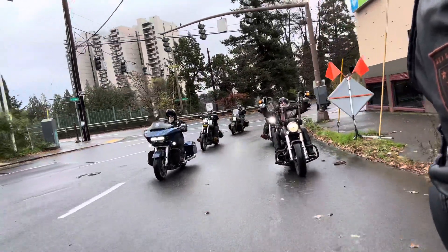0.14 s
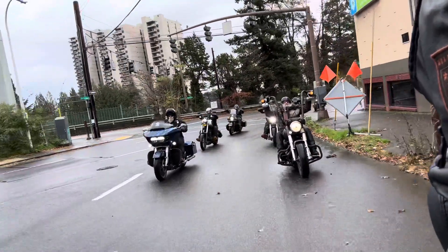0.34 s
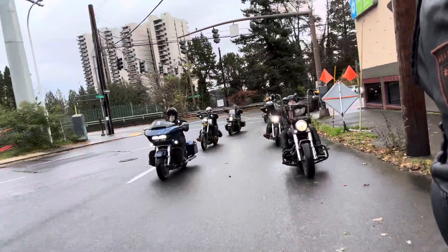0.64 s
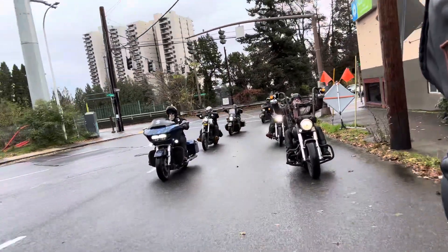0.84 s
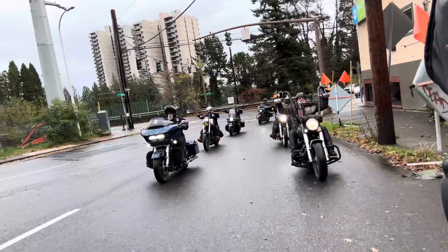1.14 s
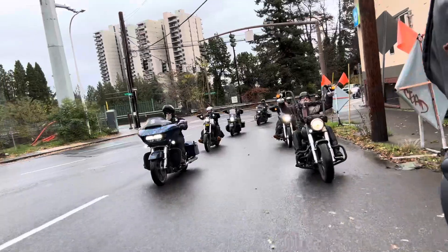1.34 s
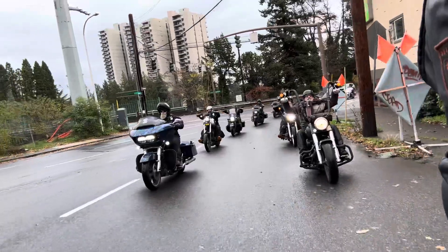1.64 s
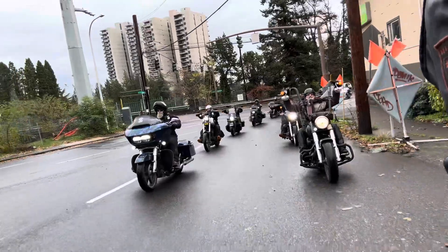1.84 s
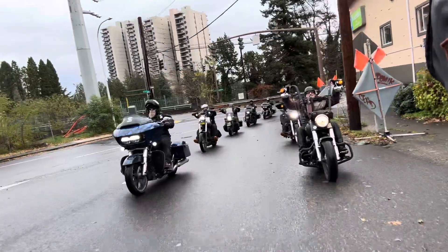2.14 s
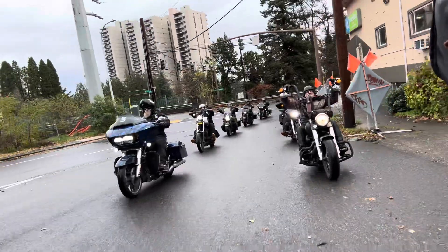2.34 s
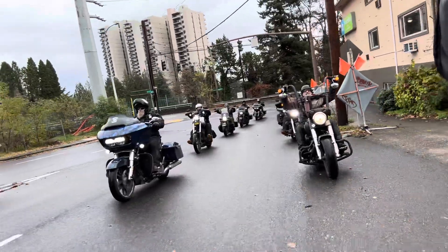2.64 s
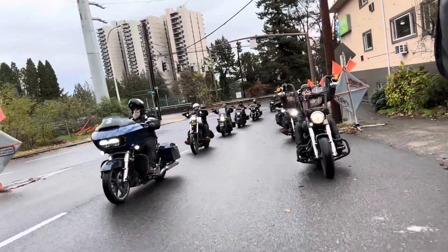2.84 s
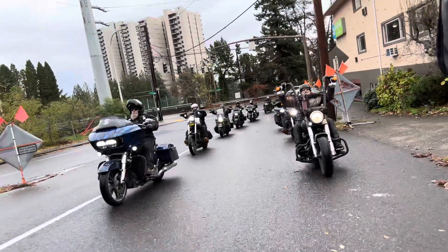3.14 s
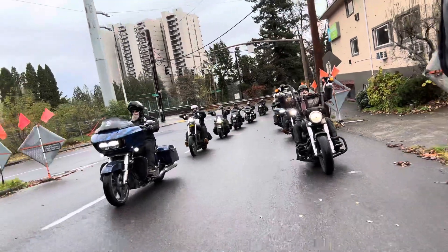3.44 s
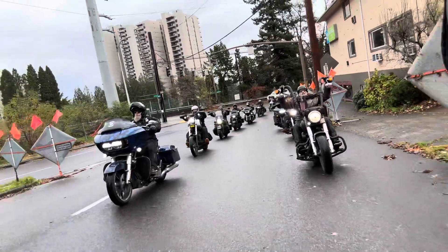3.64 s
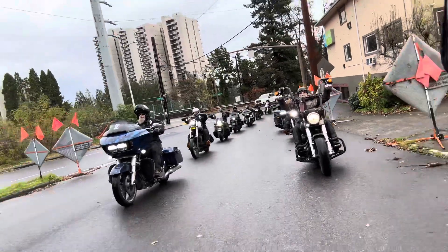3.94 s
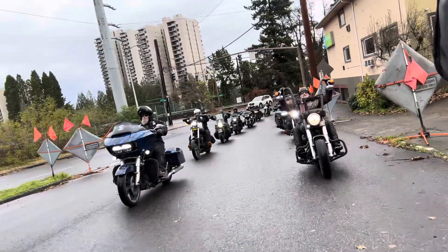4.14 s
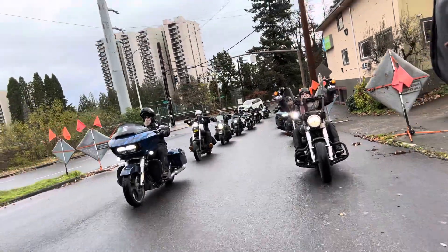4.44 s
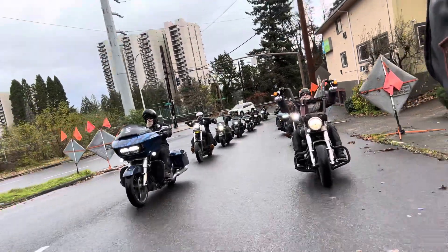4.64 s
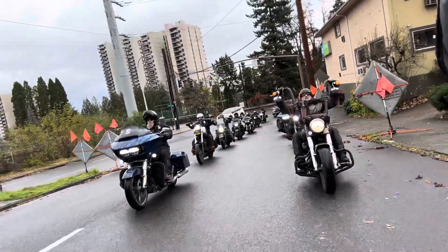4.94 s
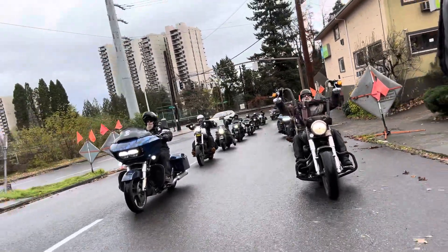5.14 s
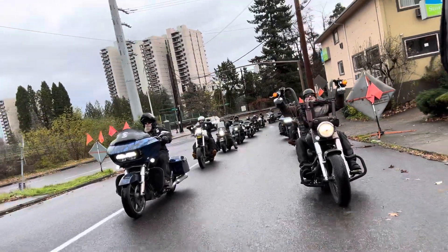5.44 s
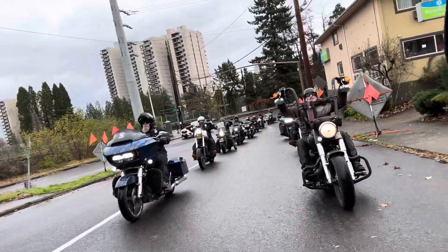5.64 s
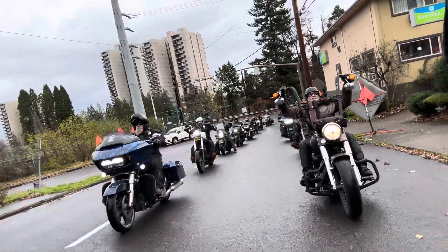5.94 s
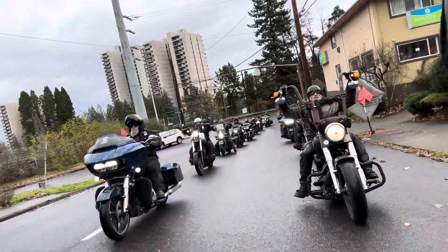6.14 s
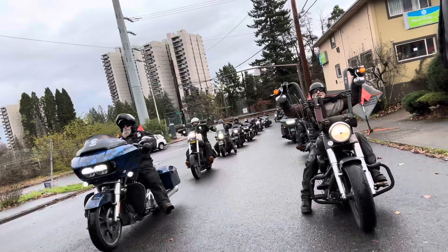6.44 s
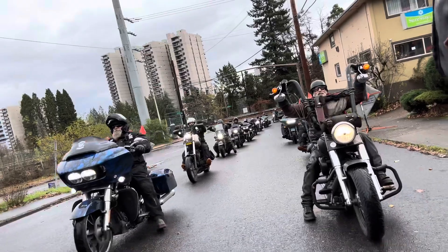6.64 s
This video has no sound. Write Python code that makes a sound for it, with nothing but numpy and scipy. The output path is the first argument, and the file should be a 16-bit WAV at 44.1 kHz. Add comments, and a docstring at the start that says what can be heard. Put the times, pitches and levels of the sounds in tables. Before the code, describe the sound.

Outdoors, close in front of a motorcycle procession, a stereo microphone hears a continuous lumpy bass rumble and soft wet-road hiss. Individual exhausts stand out: scattered dull pops, a deep burst, raspy cracks, then a dense loud crackle that fades into quick light ticking. A low hum joins later, and strong barking bursts with muffled thumps finish, briefly slapping off nearby walls.

```python
"""A column of big twin-cylinder motorcycles rolls slowly along a wet street.
From the start, many uneven firings blend into a rumble over a low wavering tone; tyres and engines hiss.
Dull pops give way to deep cracks at 0.7 s and raspy ones from 1.5 s; a higher tone joins from 2.2 to 3.4 s.
A crackling run from 3 s thins into a coasting patter until 4.3 s, and another tone enters at 4.9 s.
Barking and full cracks, then muffled ones, close the scene; the cracks echo between the buildings."""
import sys
import numpy as np
from scipy import signal
from scipy.fft import rfft, irfft, next_fast_len
from scipy.io import wavfile
from scipy.ndimage import map_coordinates

SR = 44100
rng = np.random.default_rng(int(sys.argv[2]) if len(sys.argv) > 2 else 0)


def store_pcm(level_fs):
    """Save levels as 16-bit WAV."""
    pcm = np.round(np.clip(level_fs, -1, 1) * 32767).astype(np.int16)
    wavfile.write(sys.argv[1], SR, np.atleast_2d(pcm).T)


N = 298998
HALVES = np.array([[.5], [-.5]])  # splits a left-over-right difference between the two ports


def amp(db):
    """Decibels to gain."""
    return 10 ** (np.asarray(db) / 20)


def evened(x):
    """Scales to rms 1."""
    return x / np.sqrt(np.mean(x ** 2) + 1e-20)


def read(points, hz):
    """Looks a table up on a log-frequency axis."""
    f, value = np.transpose(points)
    return np.interp(np.log(hz + 1), np.log(f + 1), value)


def curve(rows, index):
    """One column of a table, at every sample."""
    rows = np.array(rows)
    return np.interp(np.arange(N) / SR, rows[:, 0], rows[:, index])


def colour(x, gain):
    """Multiplies the spectrum by gain(Hz)."""
    size = next_fast_len(N + 4096)
    return irfft(rfft(x, size) * gain(np.fft.rfftfreq(size, 1 / SR)), size)[..., :N]


def band(hz, lo_hz, hi_hz):
    """Soft-edged pass band."""
    return 1 / np.sqrt((1 + (lo_hz / (hz + 1)) ** 8) * (1 + (hz / hi_hz) ** 8))


def wander(hz):
    """Slow random drift of rms 1, with components up to hz."""
    f = np.geomspace(hz / 20, hz, 16)[:, None]
    t = np.arange(0, N + 200, 200) / SR
    slow = (np.sin(2 * np.pi * (f * t + rng.random(f.shape))) / np.sqrt(f)).sum(0)
    return np.interp(np.arange(N) / SR, t, evened(slow))


def struck(trains, shape):
    """Starts a copy of shape at every impulse."""
    return signal.oaconvolve(trains, shape[None], axes=1)[:, :N]


# the cracks that stand out, by pipe: (time [s], strength of the jet [dB], strength of the body [dB])
CRACKS = {"thin": [(0.6853, -40, -28), (0.7023, -40, -19), (4.6907, -35.5, -32), (5.2214, -38, -28),
          (5.2315, -37.5, -29), (5.252, -40, -34), (5.2779, -39, -32.5)], "deep": [(0.7238, -27, -15),
          (0.7482, -23, -14), (0.7806, -26, -13.5), (0.8016, -21, -11.5), (0.8294, -37.5, -16.5),
          (0.848, -52, -23)], "muffled": [(0.667, -46, -19.5), (0.8994, -39, -10.5), (1.855, -42, -25),
          (1.946, -34, -20), (2.26, -46, -17), (2.65, -46, -26), (2.813, -41, -22), (3.993, -53, -22.5),
          (4.925, -41, -20.5), (5.402, -49.5, -27.5), (5.782, -39, -16.5), (6.4472, -43.5, -16),
          (6.4802, -46, -12.5), (6.5041, -35.5, -18.5), (6.638, -40, -14.5), (6.667, -39, -17),
          (6.689, -47, -13.5), (6.7326, -38.5, -20.5), (6.753, -36, -18.5)], "raspy": [(1.4526, -39.5, -31),
          (1.5065, -31, -25), (1.6506, -26.5, -22.5), (1.6714, -23, -21), (1.6921, -23, -19.5),
          (1.7114, -32.5, -27), (1.7374, -29.5, -27), (2.2104, -30.5, -28.5), (2.2573, -25, -42)],
          "crackling": [(2.9801, -29, -17.5), (3.0101, -26, -13), (3.046, -18.5, -12.5),
          (3.0699, -24.5, -12), (3.1672, -29.5, -19.5), (3.1926, -30.5, -20), (3.4271, -37, -27),
          (3.456, -21.5, -22), (3.4755, -32, -13), (3.5009, -22.5, -21), (3.5194, -25, -14.5),
          (3.5423, -24, -17.5), (3.5584, -29.5, -15.5), (3.5808, -23, -15), (3.5964, -29, -24),
          (3.6157, -29.5, -14.5), (3.6296, -16.5, -12), (3.6506, -16, -12), (3.6644, -45, -15),
          (3.685, -23, -16.5), (3.6994, -40, -25), (3.7199, -31.5, -21.5)],
          "coasting": [(3.8008, -31.5, -31), (3.8174, -46, -34.5), (3.8412, -29.5, -45),
          (3.8586, -29.5, -22.5), (3.8831, -34.5, -37.5), (3.9014, -34, -40), (3.927, -30, -28),
          (3.9464, -37, -34.5), (3.9729, -27.5, -31), (3.9928, -39, -30), (4.0208, -33, -33.5),
          (4.0402, -42, -34), (4.0716, -32, -35), (4.0926, -39, -26), (4.1235, -34, -42),
          (4.1455, -38, -27), (4.1774, -37, -28.5), (4.2009, -38.5, -33), (4.2363, -41.5, -30.5),
          (4.2612, -37, -33.5), (4.2986, -46, -38)], "barking": [(5.6351, -30.5, -29.5),
          (5.7034, -17.5, -9), (5.7269, -24, -13), (5.7494, -25.5, -20)], "full": [(1.7814, -32.5, -26.5),
          (1.8961, -32.5, -29.5), (1.9365, -51, -27.5), (5.8511, -48, -31.5), (5.8716, -30.5, -28.5),
          (5.9125, -23.5, -13), (5.9324, -23, -16.5), (5.9559, -22, -16), (5.9714, -26, -12.5),
          (5.9934, -25.5, -15.5), (6.1235, -27, -17.5), (6.1469, -19.5, -18), (6.1754, -21, -16.5),
          (6.1958, -21, -11.5), (6.2198, -25.5, -16.5), (6.5515, -24, -14.5), (6.5774, -27, -20.5),
          (6.5974, -22.5, -15.5), (6.6194, -25, -14.5)], "dull": [(0.146, -33, -32), (0.33, -35, -32.5),
          (0.367, -33, -31), (0.436, -28, -34), (1.032, -33, -35), (1.363, -39, -36), (1.547, -32, -34),
          (2.873, -27, -30.5), (3.145, -40, -33.5), (3.324, -26, -36.5), (3.381, -28, -26),
          (4.338, -38, -40.5), (4.648, -36, -26), (4.832, -41, -36.5), (5.071, -42, -41), (5.551, -29, -33),
          (6.266, -35, -24), (0.473, -36, -53), (0.621, -32, -37), (1.226, -37, -37), (1.604, -33, -42),
          (1.816, -34, -30.5), (1.918, -27, -27.5), (1.968, -33, -26), (1.98, -31, -29.5),
          (1.997, -34, -32), (2.021, -28, -33), (2.294, -25, -30.5), (3.759, -29, -28), (3.795, -31, -36),
          (4.056, -22.5, -26), (4.565, -33, -36.5), (5.307, -35.5, -35.5), (5.332, -30, -35),
          (5.599, -38, -29), (5.813, -41, -35)]}
# each pipe's balance, added to those strengths:
# (thud [dB], thump [dB], knock [dB], bark [dB], snap [dB], crackle [dB], sizzle [dB])
PIPES = {"deep": (4, -11, -18, -13, -20, -18, -15), "raspy": (2.5, -16.5, -5, -6.5, -13, -13, -13.5),
         "crackling": (4, -1.5, -1, -13.5, -19, -5.5, -11.5),
         "coasting": (-5, -7, -1.5, -20, -17, -4.5, -13),
         "barking": (-0.5, -15.5, -22, -6.5, -16, -14, -35),
         "muffled": (-0.5, -18.5, -25, -4.5, -18.5, -11.5, -12),
         "full": (7, 2, -0.5, -5.5, -11.5, -14.5, -26), "thin": (-15, -15.5, -21, -6, -2, -21, -29.5),
         "dull": (-12, -2, 2.5, -16.5, -24.5, -23, -25.5)}


def singles():
    """Rows of time and seven levels: three parts follow the body, four the jet."""
    rows = []
    for pipe, hits in CRACKS.items():
        for s, jet_db, body_db in hits:
            parts_db = np.repeat([body_db, jet_db], [3, 4]) + PIPES[pipe]
            rows.append([s, *parts_db])
    return np.array(rows)


def strays():
    """Faint dull pops from down the column, at random moments."""
    pops_per_s, loudest_db, range_db = 2.5, -27.5, 8.0  # before the balance of the dull pipe
    draw = rng.random((60, 2))
    s = np.cumsum(-np.log(1 - draw[:, 0]) / pops_per_s)
    rows = np.column_stack([s, loudest_db - range_db * draw[:, 1:] + PIPES["dull"]])
    return rows[s < N / SR - .01]


def blow(start_hz, end_hz, fall_s, decay_s, rise_s):
    """One exhaust pulse: the steep front comes first, so the pitch drops as it dies."""
    lag_s = 0.001  # the jet leaves the pipe before the body of the pulse
    t = np.maximum(np.arange(3000) / SR - lag_s, 0)
    turns = end_hz * t + (start_hz - end_hz) * fall_s * (1 - np.exp(-t / fall_s))
    pulse = np.sin(2 * np.pi * turns) * np.exp(-t / decay_s) * (1 - np.exp(-t / rise_s))
    return pulse / abs(pulse).max()


# fall in pitch of thud and thump: (start [Hz], end [Hz], time constant of the fall [s])
SWEEP = (520., 102.8, 0.00362)
# silencer resonances on the body of the pulse: (frequency [Hz], gain [dB])
BODY = [(100, 1), (200, 2), (300, -2.5), (410, 1.5), (500, 3.5), (620, 0), (750, 1), (870, 5), (1000, -4)]


def bodies(thuds, thumps, knocks):
    """The gas pulse as falling tones, coloured by the silencer: thud with thump, and knock."""
    thud = struck(thuds, blow(*SWEEP, decay_s=0.0052, rise_s=0.027))
    thump = struck(thumps, blow(*SWEEP, decay_s=0.0019, rise_s=0.00084))
    knock = struck(knocks, blow(973.0, 476.0, fall_s=0.0027, decay_s=0.0043, rise_s=0.00023))
    # the silencer cuts the body off steeply
    thump = colour(thump, lambda hz: band(hz, 0, 1000)) + colour(thud, lambda hz: band(hz, 0, 580))
    thump = colour(thump, lambda hz: amp(read(BODY, hz)))
    knock = colour(knock, lambda hz: band(hz, 590, 820) * amp(read(BODY, hz)) * np.exp(1j * -0.2))
    return thump, knock


def jet(train, table, rise_s, decay_s, alike):
    """A short puff of coloured noise at every crack."""
    t = np.arange(1000) / SR
    shape = (1 - np.exp(-t / rise_s)) * np.exp(-t / decay_s)
    puffs = struck(train, shape / shape.max())
    noise = rng.choice([-1., 1.], (2, N))
    noise = noise + alike * noise[::-1].sum(0) / 2  # turbulence partly alike at the two ports
    gain = lambda hz: amp(read(table, hz))
    return colour(puffs * noise, gain) / np.std(colour(noise, gain))


# spectra of the escaping gas, lowest first: (frequency [Hz], relative level [dB per Hz])
BARK = [(700, -34.5), (950, 6.5), (1150, 7), (1500, 9.5), (2000, 6.5), (2500, -13.5), (3200, -5),
        (3700, -10), (5000, -68)]
SNAP = [(1500, -36.5), (1900, -3), (2300, 5), (2700, 2.5), (3100, -7.5), (3500, -10.5), (4200, -45.5)]
CRACKLE = [(1900, -37), (2700, -10.5), (3600, -6), (4100, -0.5), (4500, -2.5), (5300, -4.5), (6200, -12.5),
           (7500, -49.5)]
SIZZLE = [(5500, -39.5), (6600, -4.5), (7400, -4.5), (8400, 7), (9400, 1), (10200, -26), (11200, -15.5),
          (13000, -12), (14600, -21.5), (15700, -9)]
# resonances of a long tail pipe: (frequency [Hz], relative level [dB per Hz])
RING = [(600, -36), (800, -0.5), (950, 12), (1150, -7.5), (1550, -3), (1850, -14), (2300, 3), (2750, -16),
        (3050, -3.5), (3400, -23), (4000, -46)]
# pipes long enough to ring: name to level over the jet strength [dB]
RINGS_DB = {"deep": -2.5, "full": -14.5, "raspy": -19, "muffled": -9.5}


def jets(barks, snaps, crackles, sizzles):
    """Gas leaving the pipe as four bands of turbulent noise, plus the ring of the long pipes."""
    ring = np.zeros((1, N))
    for pipe, db in RINGS_DB.items():
        s, jet_db = np.transpose(CRACKS[pipe])[:2]
        ring[0, np.round(s * SR).astype(int)] = amp(jet_db + db)
    return (jet(barks, BARK, rise_s=0.00037, decay_s=0.0063, alike=1.1)
            + jet(snaps, SNAP, rise_s=0.00092, decay_s=0.0028, alike=0.95)
            + jet(crackles, CRACKLE, rise_s=0.0013, decay_s=0.0015, alike=0.87)
            + jet(sizzles, SIZZLE, rise_s=0.0032, decay_s=0.0019, alike=3.4)
            + jet(ring, RING, rise_s=0.0015, decay_s=0.004, alike=0.94))


# where the revving bike is heard; the level difference acts on the jets:
# (time [s], left over right [dB], lead of the left port [ms], level sent to the echoes [dB])
REVVER = [(0, 5, 0.37, -14), (1.0, 1.5, 0.61, -2), (1.4, 3, -0.25, -3.5), (2.4, 3.5, 0.091, -7.5),
          (2.8, -6, 0.22, -11), (4.5, 1, 0.263, -5), (5.5, -3.5, 0.48, -8), (6.78, -7.5, 0.41, -4)]
# phase of the port pair beyond its plain delay: (frequency [Hz], lead of the left [rad])
TURN = [(100, 0.1), (250, -0.2), (450, 0.7), (600, 1.35), (1100, 0.2), (2240, -0.14), (3000, 1.8),
        (4000, -0.3), (5700, 1.1), (6600, -2), (6900, -4.5), (8500, -9.5), (9200, -11.5)]


def cracks():
    """Each crack: a knock, a thump and a thud of falling pitch, and short jets of noise."""
    rows = singles()
    scatter_db = 1.34  # each part of each crack varies
    rows[:, 1:] += scatter_db * rng.standard_normal((len(rows), 7))
    rows = np.vstack([rows, strays()])
    trains = np.zeros((7, 1, N))
    trains[:, 0, np.round(rows[:, 0] * SR).astype(int)] = amp(rows[:, 1:].T)
    thump, knock = bodies(*trains[:3])
    gas = jets(*trains[3:])
    # one port hears a bike to the side first
    heard_at = np.arange(N) + HALVES * curve(REVVER, 2) * SR / 1000

    def at_ports(x):
        """Reads a sound at each port's own arrival times."""
        both = x + 0 * HALVES
        return np.array([map_coordinates(v, at[None], order=3) for v, at in zip(both, heard_at)])

    thump, knock, gas = at_ports(thump), at_ports(knock), at_ports(gas)
    # the port pair tilts the knock to the left and the thump to the right, then turns the phase
    knock = colour(knock, lambda hz: amp(HALVES * 9.5) + 0 * hz)
    thump = thump * amp(HALVES * -0.6)
    gas = gas * amp(HALVES * curve(REVVER, 1))
    return colour(thump + knock + gas, lambda hz: np.exp(1j * HALVES * read(TURN, hz)))


# low wavering tone under the rumble: (time [s], frequency [Hz], level before the trim [dB])
LOW_TONE = [(0.0, 76, -22), (0.32, 57.2, -21.5), (0.79, 77.8, -24), (1.09, 82.9, -14), (1.6, 61.8, -25.5),
            (2.06, 65.5, -33), (2.79, 67.0, -14.5), (3.27, 67.5, -32.5), (3.49, 77.0, -9),
            (3.64, 57.2, -27), (4.02, 70.1, -18), (5.27, 70.1, -16.5), (5.49, 88.3, -20.5),
            (5.91, 66.1, -13.5), (6.04, 85.3, -18.5), (6.78, 88.1, -10.5)]
# two higher tones that hold for a while: (time [s], frequency [Hz], level before the trim [dB])
HUM_A = [(2.2, 162, -40), (2.252, 159.9, -17), (3.326, 165.1, -27), (3.4, 157, -10)]
HUM_B = [(4.9, 105.8, -13), (5.024, 115, -16), (6.092, 111.7, -17), (6.192, 100.6, -19.5),
         (6.78, 105.1, -15)]


def drone(rows):
    """A slightly wavering tone."""
    trim_db = -6.0
    t = np.arange(N) / SR
    fade = np.clip(np.minimum(t - rows[0][0] + 0.0035, rows[-1][0] + 0.02 - t) / 0.081, 0, 1)
    turns = np.cumsum(curve(rows, 1) * (1 + 0.016 * wander(14.0))) / SR + rng.random()
    level = amp(curve(rows, 2) + trim_db + 0.8 * wander(17.0))
    return np.sqrt(2) * level * fade * np.sin(2 * np.pi * turns)


def firings(cycles_per_s):
    """A twin fires twice a cycle, unevenly spaced and unevenly strong."""
    turns = np.cumsum(cycles_per_s * (1 + .1 * wander(1.5))) / SR + rng.random()
    front, rear = (np.diff(np.floor(turns + lag), prepend=np.floor(turns[0] + lag))
                   for lag in (0, .4375))  # fraction of a cycle
    return (front + 0.88 * rear) * amp(0.68 * rng.standard_normal(N))


# gain on the side's own signal, before the turned mid joins it: (frequency [Hz], factor)
APART = [(300, 0.87), (2000, 0.65), (5000, .6), (9000, .4)]
# gain of the whole side signal: (frequency [Hz], level [dB])
WIDE = [(60, -29), (100, -21.5), (180, -21.5), (320, -11), (550, -1.5), (970, -2.5), (1690, -4.5),
        (2940, 0), (5120, 0), (8930, -3)]
# tilt between the ports: (frequency [Hz], left over right gain [dB])
LEFT = [(60, 1), (100, 0), (180, 0), (320, -3), (550, 1.5), (970, 1.5), (1690, 0), (2940, 2), (5120, 4.5),
        (8930, 1.5)]


def spread(mid, side):
    """Mid and side to left and right: bass near mono, part of the side is the mid turned in phase."""
    turned = colour(mid, lambda hz: np.exp(1j * 1.7) + 0 * hz)
    side = colour(side, lambda hz: read(APART, hz)) + 0.88 * turned
    side = colour(side, lambda hz: amp(read(WIDE, hz)))
    return colour(np.array([mid + side, mid - side]), lambda hz: amp(read(LEFT, hz) * HALVES))


# the pack, levels before the trims:
# (time [s], boom level [dB], growl level [dB], rasp level [dB], hiss level [dB])
PACK = [(0.0, -39.5, -24, -31, -54), (0.05, -19, -19.5, -44.5, -50.5), (0.25, -20.5, -25.5, -46, -52),
        (0.55, -21.5, -27, -43, -52.5), (0.85, -18.5, -19, -47, -49), (1.2, -20.5, -22.5, -39, -49),
        (1.56, -16.5, -25.5, -44.5, -49.5), (1.7, -15.5, -21.5, -33.5, -44.5),
        (1.87, -25.5, -23, -41.5, -48.5), (2.08, -8.5, -24.5, -34.5, -48.5),
        (2.19, -30.5, -23.5, -42.5, -49.5), (2.26, -11.5, -22.5, -40, -48.5),
        (2.81, -20.5, -23.5, -42, -51.5), (3.04, -11, -19, -40, -45), (3.38, -20, -25, -42, -52),
        (3.63, -17.5, -23.5, -34, -53), (3.74, -18.5, -25, -38, -50), (4.14, -15, -24.5, -45.5, -51),
        (4.55, -23, -20.5, -40.5, -49), (5.0, -19, -24, -41.5, -50.5), (5.3, -22, -20.5, -38.5, -48),
        (5.63, -15.5, -21.5, -39.5, -47.5), (6.0, -17.5, -16.5, -40.5, -42.5),
        (6.08, -14, -22, -37.5, -46.5), (6.3, -18, -16, -40.5, -46.5), (6.46, -25, -18.5, -37.5, -47.5),
        (6.78, -13.5, -18.5, -42, -45.5)]
# spectrum of the blended firings: (frequency [Hz], relative level [dB per Hz])
RUMBLE = [(22, -42.5), (37, -16), (47, 2), (65, 5), (90, 0), (120, -5), (175, -3), (230, -9), (330, -18.5),
          (400, -24.5), (520, -29.5), (650, -30), (850, -31), (1000, -38.5), (1400, -48.5)]


def pack_rumble(trains):
    """Many engines' pulses smeared by their pipes and blurred with noise: boom, growl and rasp."""
    # pipes let the highs out first and the lows some ms later
    pulses = evened(colour(trains, lambda hz: np.exp(-1j * 8.86 * np.log(1 + hz / 60))))
    blur = rng.standard_normal((2, N))  # the far end of the column blurs to noise
    pulses, blur = (colour(x, lambda hz: amp(read(RUMBLE, hz))) for x in (pulses, blur))
    # (from [Hz], to [Hz], share of blur, trim [dB]); the trims leave room for drones and cracks
    layers = [(20, 121.0, 0.25, -4), (108.8, 313, 0.83, 0.33), (335, 2800, 1.4, 1)]
    rumble = 0
    for k, (lo_hz, hi_hz, share, trim_db) in enumerate(layers, start=1):
        layer = evened(colour(pulses + share * blur, lambda hz: band(hz, lo_hz, hi_hz)))
        rumble = rumble + amp(curve(PACK, k) + trim_db) * layer
    return rumble


# spectrum of tyres and engines: (frequency [Hz], relative level [dB per Hz])
HISS = [(590, 6), (1000, 1), (1320, 1.5), (1510, -0.5), (1750, -1), (2350, -4), (2750, -7), (3050, -9),
        (4040, -9.5), (6270, -16.5), (7850, -9), (9380, -12.5), (12200, -81), (20600, -120)]
# very faint noise above 10 kHz: (frequency [Hz], relative level [dB per Hz])
HIGH_NOISE = [(10300, -45.5), (11000, -9.5), (12400, 0.5), (13600, -8), (14200, -18), (15000, -38.5)]


def pack_hiss(trains):
    """Filtered noise: the hiss, the spray of tyres on the wet road, and a very faint high noise."""
    puffs = evened(struck(trains, np.exp(-np.arange(1500) / SR / 0.0061)))
    noise = (1 + 0.26 * puffs) * amp(1.18 * wander(90.)) * rng.standard_normal((2, N))
    hiss = evened(colour(noise, lambda hz: amp(read(HISS, hz)) * band(hz, 0, 5170)))
    spray = evened(colour(noise, lambda hz: amp(read(HISS, hz)) * band(hz, 5290, 9700) ** 2))
    high = evened(colour(noise * (1 + .3 * puffs), lambda hz: amp(read(HIGH_NOISE, hz))))
    upper = spray + amp(-14.5) * high
    hiss_db = curve(PACK, 4)
    upper_db = -60.5 + hiss_db - hiss_db.mean()  # swells and sinks with the hiss
    return amp(hiss_db + 4.5) * hiss + amp(upper_db) * upper


def pack():
    """Many engines at their own speeds: the same firings make the rumble and pulse the hiss."""
    cycles_per_s = np.tile(np.geomspace(9, 21, 6), 2)  # six engines each for mid and side
    trains = np.array([firings(c) for c in cycles_per_s]).reshape(2, 6, N)
    farther = amp(-np.linspace(0, 10.5, 6))[:, None]  # farther bikes are fainter
    trains = (trains * farther).sum(1)
    return spread(*(pack_rumble(trains) + pack_hiss(trains)))


# how fast the echoes die: (frequency [Hz], time to fall by 60 dB [s])
STREET = [(300, 0.36), (1000, 0.1), (2500, 0.14), (5000, 0.086), (10000, 0.13)]


def street(x):
    """Sparse echoes of random sign off walls and road, each band dying at its own speed."""
    taps = np.zeros((2, 16000))
    at = np.arange(300, 15900, 24) + rng.integers(0, 24, (2, 650))
    np.put_along_axis(taps, at, rng.choice([-1., 1.], at.shape), 1)
    hz, t, z = signal.stft(taps, SR, nperseg=256)
    tail = signal.istft(z * amp(-60 * t / read(STREET, hz)[:, None]), SR, nperseg=256)[1]
    # the knock echoes less
    far = colour(x, lambda hz: band(hz, 270, SR) * amp(-9.0 * band(hz, 460, 1050)))
    return signal.oaconvolve(far, tail / np.linalg.norm(tail[0]), axes=1)[:, :N]


def scene():
    """Cracks with their echoes, over the wavering tones and the pack."""
    near = cracks()
    echoes = street(near * amp(curve(REVVER, 3)))
    return near + drone(LOW_TONE) + drone(HUM_A) + drone(HUM_B) + pack() + echoes


def record(dry):
    """The microphone drops the deepest bass; a soft ceiling, then the band limit."""
    edge_hz, ceiling = 15950, 1.25
    heard = colour(dry, lambda hz: band(hz, 33, SR))
    soft = ceiling * np.tanh(heard / ceiling)
    lowpass = signal.firwin(511, edge_hz, window=("kaiser", 9), fs=SR)
    return signal.oaconvolve(soft, lowpass[None], "same")


dry = scene()
out = record(dry)
store_pcm(out)
```